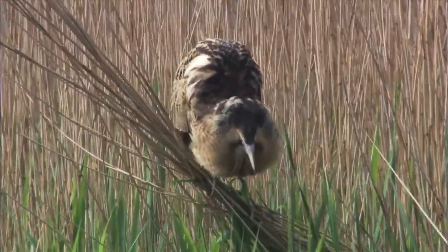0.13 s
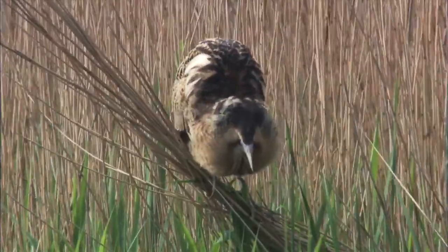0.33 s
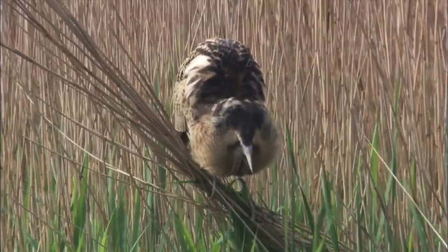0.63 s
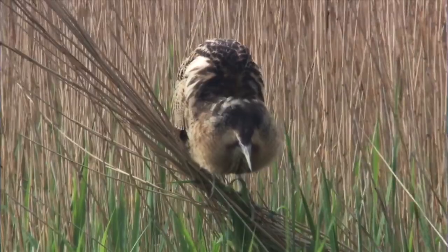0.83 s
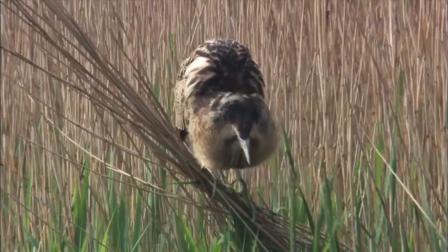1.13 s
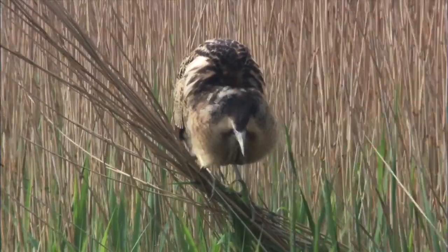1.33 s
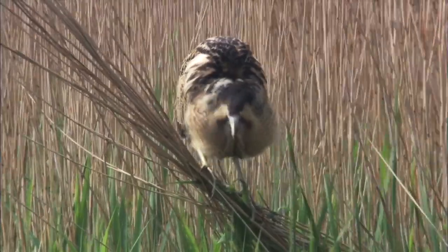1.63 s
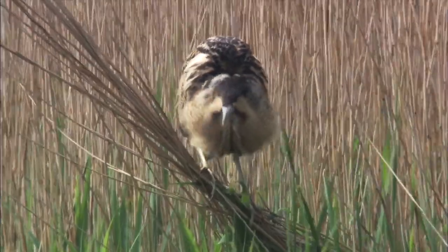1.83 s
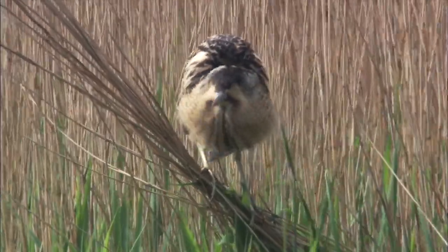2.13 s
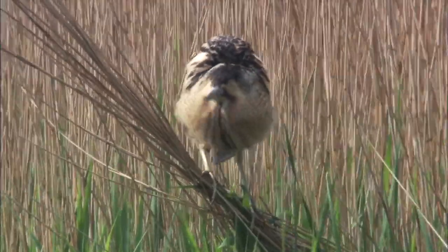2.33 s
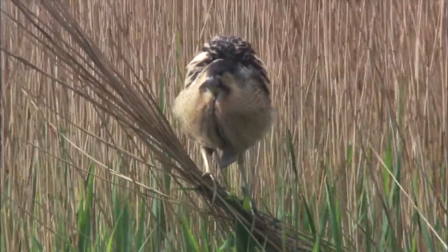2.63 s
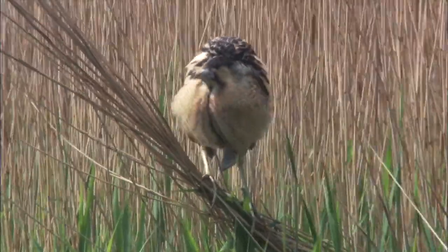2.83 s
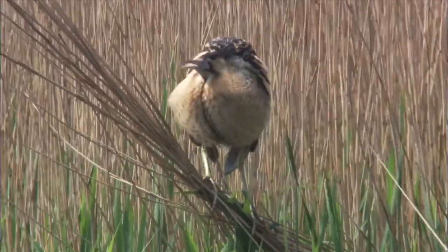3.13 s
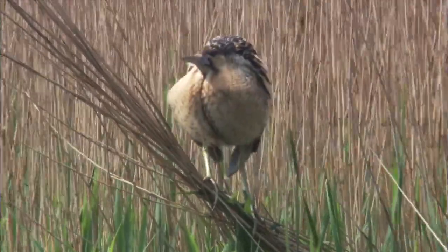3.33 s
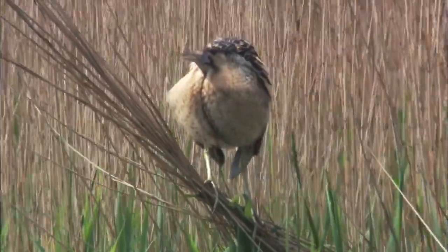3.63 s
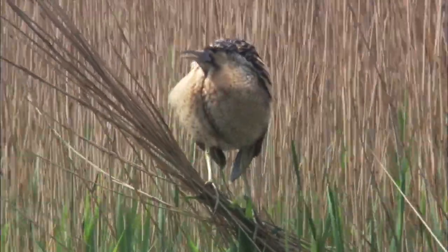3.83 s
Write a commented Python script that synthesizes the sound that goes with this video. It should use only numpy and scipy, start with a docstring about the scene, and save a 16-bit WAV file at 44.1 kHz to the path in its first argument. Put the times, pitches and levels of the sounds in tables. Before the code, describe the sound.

One low bittern boom echoes across the marsh, then songbird whistles, churrs and a buzzy trill

```python
"""A bittern booms once at the start, and the boom returns twice from far banks within a second.
From the start a songbird on the right whistles and slides, and a water bird pips now and then.
A warbler churrs in the reeds, with low tones beside the churrs; later dry stems tick, and two very
faint whistles sound near 9 kHz. Near 3.1 s the songbird begins a buzzy trill. Wind and a far chorus,
made of noise, last throughout; the birds are gliding near-sine tones, heard by a pair of microphone ports."""
import sys
import numpy as np
from scipy import signal
from scipy.fft import rfft, irfft
from scipy.io import wavfile
from scipy.ndimage import uniform_filter1d, map_coordinates

SR = 44100
rng = np.random.default_rng(int(sys.argv[2]) if len(sys.argv) > 2 else 0)


def to_wav(sig):
    """Store sig (one row per channel, or 1-D mono) as 16-bit WAV at the path in sys.argv[1].

    Samples outside -1..1 are clipped; the rate is SR.
    """
    pcm = np.clip(np.atleast_2d(sig), -1, 1) * 32767
    pcm = np.round(pcm).astype(np.int16)
    wavfile.write(sys.argv[1], SR, pcm.T)  # frames by channels


N = 176400  # samples: 4 s

# Levels in dB are those before the final mix.
# The path of the boom. Each row: time in seconds, pitch in Hz, level in dB.
BOOM_PATH = [(0.0, 138, -46.5), (0.028, 136.7, -16), (0.049, 131, -14.5), (0.064, 119.6, -25.5),
             (0.083, 142.5, -12.5), (0.1, 146.8, -12), (0.18, 141.7, -8.5), (0.316, 138.4, -10),
             (0.408, 143.7, -21.5), (0.418, 135, -27.5), (0.472, 140, -27), (0.58, 148, -49)]
# Echoes from far banks. Each row: delay in seconds, level in dB against the boom.
BANK_ECHOES = [(.595, -20), (0.929, -35)]
BOOM_OCTAVE_DB, BOOM_TWELFTH_DB, BOOM_PAN_DB = -31.5, -43, -1.2  # overtones at the loudest moment
# A lower and a higher side tone as the air sac empties
SLACK_S, SLACK_LEN_S = .32, 0.11
SLACK_HZ, SLACK_END_HZ, SLACK_DB = 122, 104, -28.5
SLACK_UPPER_HZ, SLACK_UPPER_END_HZ, SLACK_UPPER_DB = 220, 168.4, -38.5
ECHO_FADE_DB_S, ECHO_RISE_S, ECHO_FLUTTER_DB = -49, 0.063, .7
MARSH_T60_S, MARSH_DB = 1.6, -45


def bittern(t):
    """The swollen throat sounds an almost pure tone, with echoes off the banks."""
    s, hz, db = np.array(BOOM_PATH).T
    phase = 2 * np.pi * np.cumsum(np.interp(t, s, hz)) / SR
    size = np.sqrt(2) * uniform_filter1d(undb(np.interp(t, s, db, right=-90)), size=300)
    strength = size / size.max()
    # A stronger boom is richer in overtones
    octave = undb(BOOM_OCTAVE_DB) * strength * np.sin(2 * phase)
    twelfth = undb(BOOM_TWELFTH_DB) * strength ** 2 * np.sin(3 * phase)
    boom = size * (np.sin(phase) + octave + twelfth)
    lower = note(SLACK_LEN_S, SLACK_HZ, SLACK_END_HZ, SLACK_LEN_S, SLACK_DB, edge_s=0.051)
    upper = note(SLACK_LEN_S, SLACK_UPPER_HZ, SLACK_UPPER_END_HZ, SLACK_LEN_S, SLACK_UPPER_DB, edge_s=0.03)
    add(boom, lower, SLACK_S)
    add(boom, upper, SLACK_S)

    echoes = np.zeros(N)
    rise = np.clip(t / ECHO_RISE_S, 0, 1) ** 2
    for lag_s, echo_db in BANK_ECHOES:
        add(echoes, undb(echo_db + ECHO_FADE_DB_S * t) * rise * boom, lag_s)
    echoes *= undb(ECHO_FLUTTER_DB * walk(27.4))
    far = tail(boom * walk(7.1), MARSH_T60_S, MARSH_DB, .5)
    return place(boom + echoes, BOOM_PAN_DB, .00007) + 1.2 * far[0] + 0.32 * far


# Songbird notes, and two very faint high whistles near 9 kHz (the rows at 1.132 s and 1.333 s).
# Each row: start in seconds, length in seconds, first pitch in Hz, last pitch in Hz,
# slide time in seconds (may outlast the note), level in dB, warble depth in Hz.
HIGH_NOTES = [(0, 0.016, 5760, 5560, 0.018, -34.5, 59), (0, 0.051, 6700, 6300, 0.031, -42, 294),
              (0.031, 0.036, 6740, 4604, 0.015, -34, -9), (0.078, 0.0083, 4650, 4200, 0.021, -29.5, 5.5),
              (.05, 0.015, 2950, 3060, 0.013, -48, 5), (0.065, 0.066, 3055, 3765, 0.046, -39, -3),
              (0.099, 0.014, 3550, 3010, .02, -52, 3.5), (0.133, 0.13, 3890, 3740, 0.075, -50, 90),
              (0.199, 0.15, 6914, 6865, 0.032, -41.5, 166), (0.347, 0.039, 5530, 4050, 0.049, -39.5, 60),
              (0.356, 0.11, 4770, 4720, .1, -42.5, 600), (0.402, 0.033, 6590, 5886, 0.01, -33, 2),
              (0.427, 0.061, 5690, 3070, 0.06, -46.5, 68), (0.473, 0.09, 4630, 4810, 0.0755, -43.5, 500),
              (0.539, 0.03, 4500, 3925, 0.0438, -44.5, 80), (0.755, 0.01, 6930, 4800, 0.019, -35.5, 0),
              (0.761, 0.083, 4980, 4530, 0.082, -38, -6), (0.877, 0.024, 4830, 4080, 0.028, -43.5, 0),
              (0.895, 0.046, 2900, 3048, 0.073, -48.5, 60), (1.122, 0.022, 6740, 5780, 0.019, -35.5, -17),
              (1.152, 0.033, 6000, 2530, 0.044, -38.5, -2), (1.239, 0.043, 4440, 4080, 0.029, -49, 0),
              (1.132, 0.045, 9200, 9030, 0.079, -66.5, 148), (1.333, 0.079, 9400, 8700, 0.059, -67, 152),
              (1.382, 0.044, 5600, 5140, 0.037, -50.5, 606), (1.516, 0.062, 3610, 3370, 0.055, -46.5, 193),
              (1.56, 0.064, 4490, 4266, 0.069, -48.5, 350), (1.932, 0.15, 5900, 6180, 0.13, -60.5, 200),
              (2.081, 0.13, 6220, 6140, 0.18, -57, 250), (2.403, 0.083, 6800, 2480, 0.27, -49, 302),
              (2.505, 0.08, 5380, 4990, 0.068, -53.5, 150), (2.546, 0.067, 5130, 4720, 0.1, -42.5, 248),
              (2.617, 0.144, 5090, 4906, 0.2, -52.5, 183), (2.757, 0.034, 7900, 7100, 0.038, -54, 118),
              (2.774, 0.15, 7010, 6750, 0.11, -53, 98), (2.948, 0.08, 5333, 5042, 0.09, -47, 31),
              (3.024, 0.035, 5050, 5060, 0.034, -40.5, -8), (3.708, 0.054, 7100, 6400, 0.064, -56, 60),
              (3.945, 0.058, 7750, 7300, 0.044, -60, 300)]
WARBLE_HZ, WARBLE_ROUGH = 157.6, .3
SWELL_SHARE, SWELL_FROM_HZ = .3, 240  # deeply warbled notes swell in and out softly
FLUTTER_DB, TRILL_FLUTTER_DB = 2, 1.5
TRILL_S, TRILL_DB, TRILL_FADE_DB_S = 3.088, -41, -3
TRILL_MID_HZ, TRILL_DEPTH_HZ, TRILL_SWEEP_HZ = 5163, 560, 51.6  # sweeps per second
TRILL_JITTER, TRILL_ROUGH_HZ = .15, 30  # jitter in radians
TRILL_RATE_HZ, TRILL_BEAT_S, TRILL_GAP_DB = 12.9, .018, -7  # the gap term reaches twice this
TRILL_TOP_DB = 2  # the top of each sweep is louder
TRILL_LOW_LATE_S = .014  # each beat reaches the bottom of the sweep later


def songbird_and_high_whistles(t):
    """Slides and whistles, some warbled in pitch, two very faint near 9 kHz; then a buzzy trill."""
    notes = np.zeros(N)
    warble_hz = WARBLE_HZ * (1 + 0.14 * walk(30))
    warble = np.sin(2 * np.pi * np.cumsum(warble_hz) / SR) + WARBLE_ROUGH * walk(300)
    for s, len_s, from_hz, to_hz, slide_s, db, depth_hz in HIGH_NOTES:
        i = np.minimum(int(s * SR) + np.arange(int(len_s * SR)), N - 1)
        edge_s = 0.0054 + SWELL_SHARE * min(len_s, .06) * (depth_hz > SWELL_FROM_HZ)
        add(notes, note(len_s, from_hz, to_hz, slide_s, db, depth_hz * warble[i], edge_s, bend=2.2), s)
    trill = songbird_trill(t - TRILL_S)
    flutter = walk(120)
    return notes * undb(FLUTTER_DB * flutter) + trill * undb(TRILL_FLUTTER_DB * flutter)


def songbird_trill(u):
    """One tone sweeps quickly up and down while slower beats swell and fade its level."""
    sweep = np.cos(2 * np.pi * TRILL_SWEEP_HZ * u + TRILL_JITTER * walk(40))
    hz = TRILL_MID_HZ + TRILL_DEPTH_HZ * sweep + TRILL_ROUGH_HZ * walk(200)
    hz += 60 * np.sin(2 * np.pi * TRILL_RATE_HZ * u + 0.34)
    height = (hz - TRILL_MID_HZ) / TRILL_DEPTH_HZ  # about -1 at the bottom, 1 at the top
    beat_u = u - TRILL_BEAT_S - TRILL_LOW_LATE_S * (1 - height) / 2
    gap_db = TRILL_GAP_DB * (1 - np.cos(2 * np.pi * TRILL_RATE_HZ * beat_u))
    db = TRILL_DB + TRILL_TOP_DB * height + TRILL_FADE_DB_S * u + gap_db
    return np.clip(u / .01, 0, 1) * undb(db) * np.sin(2 * np.pi * np.cumsum(hz) / SR)


# The warbler's churrs. Each row: start in seconds, length in seconds, first pitch in Hz,
# last pitch in Hz, level in dB.
CHURRS = [(0.102, 0.016, 2884, 2510, -44.5), (0.131, 0.032, 2912, 2337, -40.5),
          (0.42, 0.034, 2966, 2415, -48.5), (0.459, 0.038, 3004, 2335, -40.5),
          (0.793, 0.032, 2857, 2383, -45), (0.826, 0.058, 2660, 2395, -54), (1.057, 0.04, 2883, 2335, -46),
          (1.31, 0.038, 2886, 2412, -46), (1.573, 0.032, 3017, 2530, -43), (1.841, 0.02, 2793, 2145, -47),
          (1.875, 0.027, 2674, 2320, -45), (2.128, 0.017, 2843, 2260, -43),
          (2.166, 0.027, 2707, 2314, -44.5), (2.431, 0.025, 2780, 2180, -47),
          (2.471, 0.026, 2714, 2347, -45.5), (2.746, 0.032, 2850, 2340, -46),
          (2.99, 0.0398, 2836, 2287, -45), (3.251, 0.043, 2906, 2282, -45), (3.516, 0.039, 2216, 1955, -58),
          (3.571, 0.036, 2482, 1840, -50.5), (3.823, 0.014, 3450, 2730, -49),
          (3.836, 0.016, 2920, 2790, -40), (3.855, 0.026, 3187, 2500, -43), (3.878, 0.034, 3200, 2800, -50)]
CHURR_UPPER, CHURR_UPPER_DB = 1.5, -14.5  # pitch ratio and level of a fainter, higher band
CHURR_RATE_HZ, CHURR_DEPTH, CHURR_SPREAD_HZ = 200, 0.5, 260


def warbler_churrs():
    """Falling tones, made rough by fast shaking of both pitch and level."""
    out = np.zeros(N)
    beat = 2 * np.pi * np.cumsum(CHURR_RATE_HZ * (1 + 0.16 * walk(80))) / SR
    shake_hz = CHURR_SPREAD_HZ * (0.59 * walk(400) - np.cos(beat))
    for s, len_s, from_hz, to_hz, db in CHURRS:
        i = int(s * SR) + np.arange(int(len_s * SR))
        lower = note(len_s, from_hz, to_hz, len_s, db, shake_hz[i])
        upper = note(len_s, CHURR_UPPER * from_hz, CHURR_UPPER * to_hz, len_s,
                     db + CHURR_UPPER_DB, shake_hz[i])
        add(out, (lower + upper) * (1 + CHURR_DEPTH * np.sin(beat[i])), s)
    return out


# Low tones beside the churrs, some rising under them as a second voice. Each row:
# start in seconds, length in seconds, first pitch in Hz, last pitch in Hz, level in dB.
LOW_TONES = [(0.419, 0.016, 1500, 1795, -46.5), (0.511, 0.0096, 1447, 1690, -44),
             (0.556, 0.024, 1510, 2110, -48.5), (1.022, 0.039, 2195, 1480, -48),
             (1.104, 0.037, 2030, 1583, -47.5), (1.161, 0.028, 1976, 1196, -53.5),
             (1.224, 0.025, 2710, 1123, -50), (1.312, 0.022, 2128, 1575, -48),
             (1.382, 0.038, 2010, 1650, -68), (1.569, 0.026, 1575, 1970, -53),
             (2.738, 0.044, 1758, 1950, -51.5), (2.985, 0.049, 1730, 1980, -54.5),
             (3.246, 0.051, 1736, 1950, -54.5), (2.657, 0.12, 1290, 1293, -61),
             (3.506, .04, 2360, 1916, -48), (3.573, 0.035, 2608, 1796, -44.5),
             (1.93, 0.156, 2447, 2440, -63), (3.814, 0.046, 1326, 1360, -61)]


def low_tones():
    """Faint near-sine tones beside the churrs glide up or down."""
    out = np.zeros(N)
    for s, len_s, from_hz, to_hz, db in LOW_TONES:
        add(out, note(len_s, from_hz, to_hz, len_s, db), s)
    return out


# The water bird's pips. Each row: start in seconds, level of the low tone in dB,
# level of its octave above the low tone in dB.
PIPS = [(0.044, -40.5, 1), (1.478, -39, 3.5), (3.706, -47, 7.5)]
PIP_LEN_S, PIP_EDGE_S, PIP_FLUTTER_DB = .035, 0.0088, 2
PIP_HZ, PIP_END_HZ = 1108, 956  # the pip stops before it has slid all the way
PIP_ECHO_S, PIP_ECHO_DB = 0.091, -18.5


def water_bird():
    """Each pip is a falling tone and its octave, followed by one echo."""
    pips = np.zeros(N)
    for s, db, octave_db in PIPS:
        low, octave = [note(PIP_LEN_S, k * PIP_HZ, k * PIP_END_HZ, 1.2 * PIP_LEN_S,
                            db + (k - 1) * octave_db, edge_s=PIP_EDGE_S) for k in (1, 2)]
        pip = low + octave
        add(pips, pip, s)
        add(pips, pip * undb(PIP_ECHO_DB), s + PIP_ECHO_S)
    return pips * undb(PIP_FLUTTER_DB * walk(150))


# Stem ticks. Each row: start in seconds, level in dB before filtering, lowest pitch in Hz.
TICKS = [(0.648, -26, 2100), (0.674, -35, 3560), (0.9738, -40.5, 3470), (1.0355, -43, 3440),
         (1.965, -41, 2100), (2.467, -34, 2100), (2.595, -36, 5000), (3.522, -42, 6800), (3.551, -36, 6800)]
TICK_HIGH_HZ, TICK_S, TICK_ATTACK_S = 9000, 0.005, .002


def stems():
    """Dry stems tick against each other: short bursts of filtered noise."""
    out = np.zeros(N)
    u = np.arange(600) / SR
    for s, db, low_hz in TICKS:
        hiss = rng.standard_normal(600)
        tick = undb(db) * hiss * np.exp(-u / TICK_S) * np.minimum(u / TICK_ATTACK_S, 1)
        tick = band(tick, low_hz, TICK_HIGH_HZ)
        add(out, band(tick, .5 * low_hz, 1.15 * TICK_HIGH_HZ), s)
    return out


# Tone colour of wind and far chorus. Each row: pitch in Hz, relative level in dB per Hz.
AIR_COLOUR = [(15, -56.5), (25, -34), (48, -19), (107, 0), (246, -3), (379, -6), (433, -6.5), (742, -13.5),
              (1110, -19), (2240, -21), (2780, -20), (10700, -30.5), (15500, -52.5)]
# How alike left and right are. Each row: pitch in Hz, likeness (1 means the same).
LIKENESS = [(60, 0.91), (400, 0.71), (1300, 0.5), (4400, 0.057)]
# Level changes. Each row: time in seconds, bass rumble in dB, far chorus in dB, top treble in dB.
AIR_CHANGES = [(0, 2, 7, 1.5), (.5, 4, 5.5, -1), (.7, 6.5, 8, -1), (1, 5.5, 8, 0.5), (1.3, 4.5, 6.5, 1),
               (1.6, -2, 2.5, 3), (1.8, -1.5, 0.5, -3), (2, -3, 4, 0.5), (2.35, -0.5, 1.5, 4),
               (2.47, -3, 7, 3.5), (2.6, -1.5, 6, 1), (2.75, -3, 0, -5.5), (3.3, 0, 2, 0),
               (4, -5.5, 2.5, -2)]
AIR_DB = -45.5  # level of the part shared by both sides, before the changes


def air(t):
    """Wind and chorus: noise bands that flicker a little; the bass is alike left and right."""
    f = np.log(np.fft.rfftfreq(N, 1 / SR) + 1)
    hz, colour_db = np.array(AIR_COLOUR).T
    shape = undb(np.interp(f, np.log(hz), colour_db))
    hz, likeness = np.array(LIKENESS).T
    like = np.clip(np.interp(f, np.log(hz), likeness), -.9, .99)
    mid, side = rfft(rng.standard_normal((2, N))) * shape * np.sqrt([1 + like, 1 - like])
    both = np.array([mid + side, mid - side])
    both *= undb(AIR_DB) / np.std(irfft(mid, N))

    out = np.zeros((2, N))
    s, bass_db, chorus_db, top_db = np.array(AIR_CHANGES).T
    # Overlapping bands; c is the natural log of the centre in Hz
    for c in np.arange(3, 10, .3):
        db = 1.1 * walk(6)
        if c < 5:
            db += np.interp(t, s, bass_db)
        if 7 < c < 8.8:
            db += np.interp(t, s, chorus_db)
        if c >= 8.8:
            db += np.interp(t, s, top_db)
        out += undb(db) * irfft(both * np.clip(1 - abs(f - c) / .3, 0, 1), N)
    return out


def undb(db):
    """Turn dB into a plain multiplier."""
    return 10 ** (np.asarray(db) / 20)


def band(x, lo_hz, hi_hz):
    """Keep mainly the pitches between two limits."""
    return signal.sosfilt(signal.butter(2, [lo_hz, hi_hz], "bandpass", fs=SR, output="sos"), x)


def walk(rate):
    """Random levels, each held for 1 / rate seconds, then smoothed twice."""
    k = int(SR / rate)
    steps = np.repeat(rng.standard_normal(N // k + 1), k)
    return 1.2 * uniform_filter1d(uniform_filter1d(steps, k), k)[:N]


def add(out, x, start_s):
    """Mix a sound in at its start time, cutting what runs past the end."""
    i = max(int(start_s * SR), 0)
    out[i:i + len(x)] += x[:max(N - i, 0)]


def note(len_s, from_hz, to_hz, slide_s, db, wobble_hz=0, edge_s=0.0057, bend=1.225):
    """A near sine that slides quickly at first, then settles, with soft edges."""
    t = np.arange(int(len_s * SR)) / SR
    hz = to_hz + (from_hz - to_hz) * np.clip(1 - t / slide_s, 0, 1) ** bend + wobble_hz
    env = np.sin(np.pi / 2 * np.clip(np.minimum(t, len_s - t) / edge_s, 0, 1))
    return np.sqrt(2) * undb(db) * env * np.sin(2 * np.pi * np.cumsum(hz) / SR)


def tail(x, t60_s, db, rise_s):
    """Scattered sound: smear it with decaying noise, drawn separately for left and right."""
    t = np.arange(int(t60_s * SR)) / SR
    noise = rng.standard_normal((2, len(t))) * undb(-60 * t / t60_s) * np.clip(t / rise_s, 0, 1)
    return undb(db) * np.array([signal.fftconvolve(x, h / np.sqrt(np.sum(h ** 2)))[:N] for h in noise])


def place(x, pan_db, lag_s):
    """Level and arrival differ between two ports: negative pan favours right, which hears later."""
    late = map_coordinates(x, [np.arange(N) - lag_s * SR])
    return np.array([x * undb(pan_db / 2), late * undb(-pan_db / 2)])


SWAY_S, SWAY_HZ = .00006, 60.93


def sway(x):
    """Swaying stems shift the scattered paths to and fro."""
    return map_coordinates(x, [np.arange(N) + SWAY_S * SR * walk(SWAY_HZ)])


SONG_PAN_DB, SONG_LAG_S, SONG_T60_S, SONG_WET_DB = -9, .00009, 0.43, -0.5
REED_T60_S, REED_DB, REED_RISE_S = 0.22, -0.5, 0.0013


def scene():
    """Place each source between the ports and add its scattered sound."""
    t = np.arange(N) / SR
    high, pips, ticks = songbird_and_high_whistles(t), water_bird(), stems()
    churrs = warbler_churrs() + low_tones()
    wash = tail(sway(high), SONG_T60_S, SONG_WET_DB, REED_RISE_S)
    scattered = sway(churrs + .4 * pips + 0.46 * ticks)
    reeds = tail(scattered, REED_T60_S, REED_DB, REED_RISE_S)

    out = bittern(t)
    out += place(0.87 * high + 0.34 * wash[0], SONG_PAN_DB, SONG_LAG_S) + 1.14 * wash
    out += place(churrs + 0.4 * reeds[0], -10.0, .00004) + 0.9 * reeds
    out += place(pips, -1.5, .0001)
    out += place(ticks, -0.94, .00003)
    return out + air(t)


TOP_HZ = 15700


def record(dry):
    """The recorder cuts the top with a steep low-pass filter."""
    return signal.sosfilt(signal.ellip(10, .2, 80, TOP_HZ, fs=SR, output="sos"), dry)


dry = scene()
out = record(dry)
to_wav(out)
```